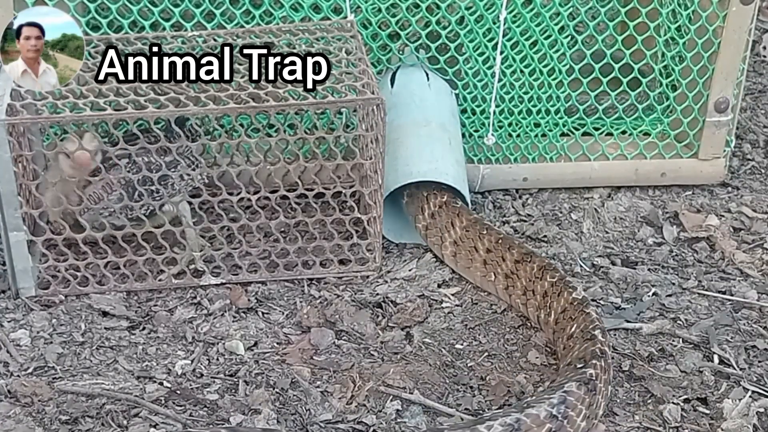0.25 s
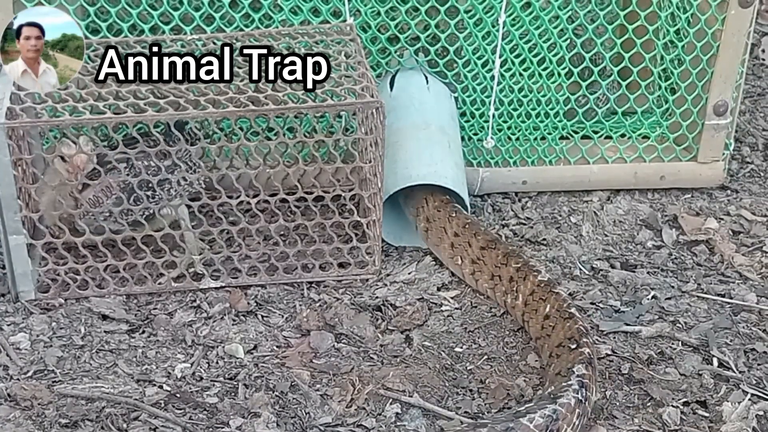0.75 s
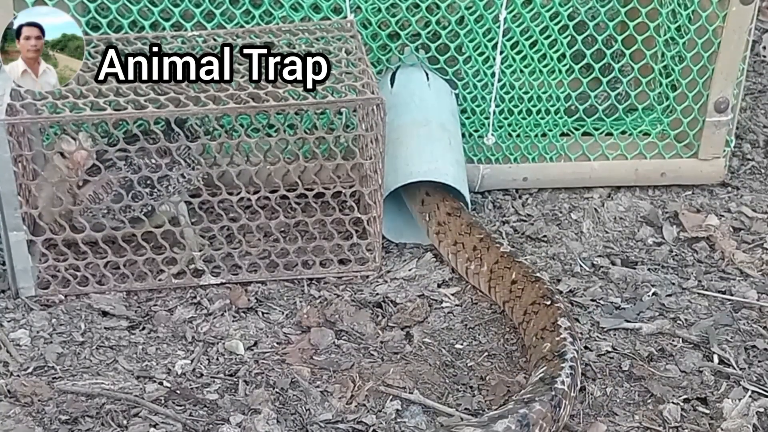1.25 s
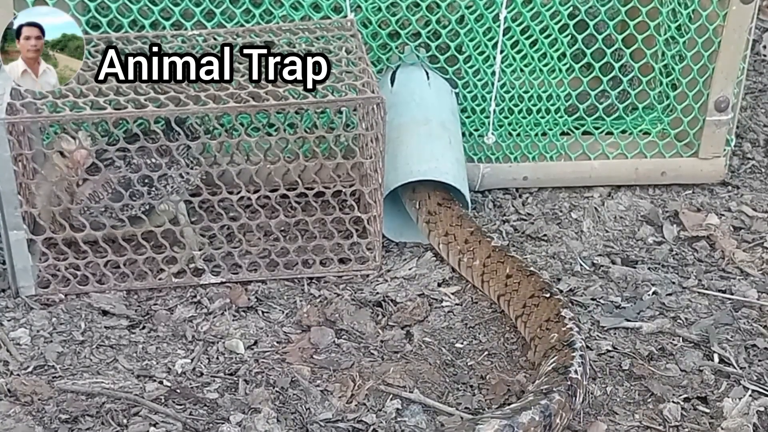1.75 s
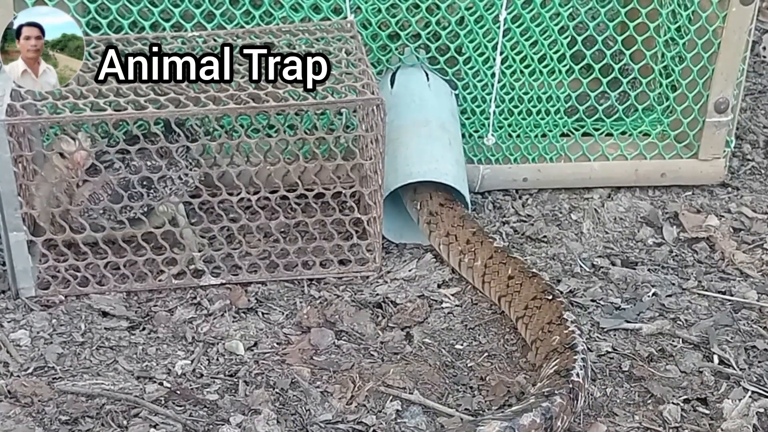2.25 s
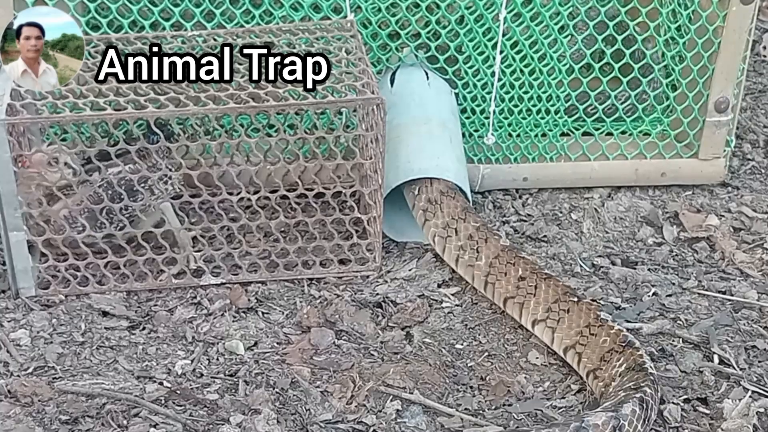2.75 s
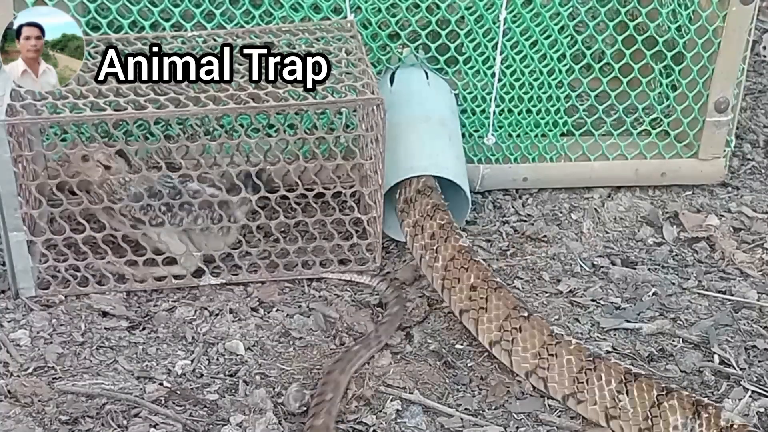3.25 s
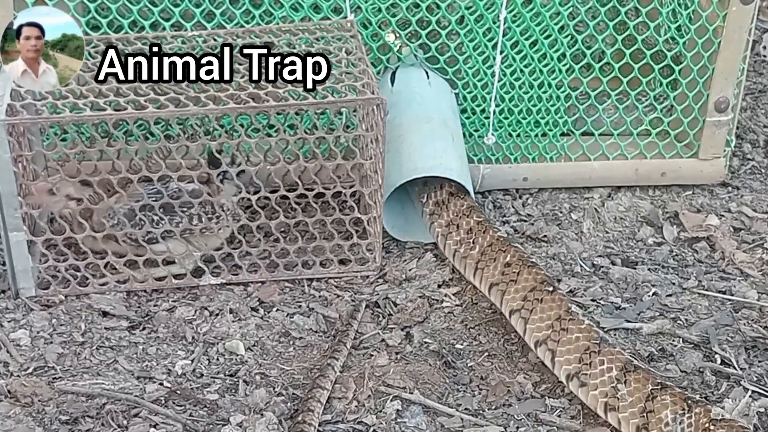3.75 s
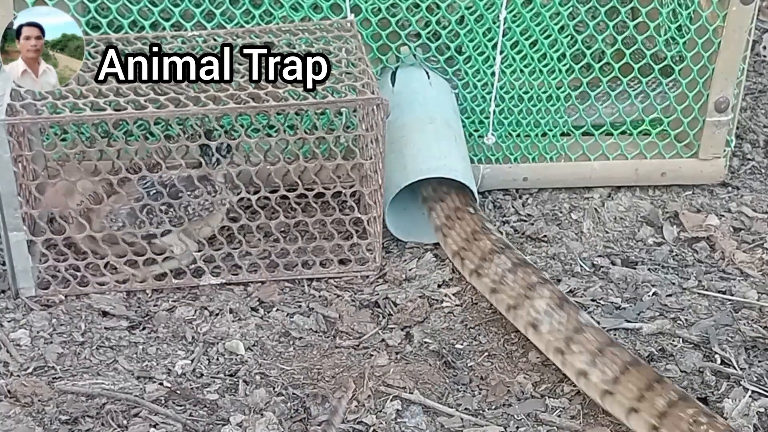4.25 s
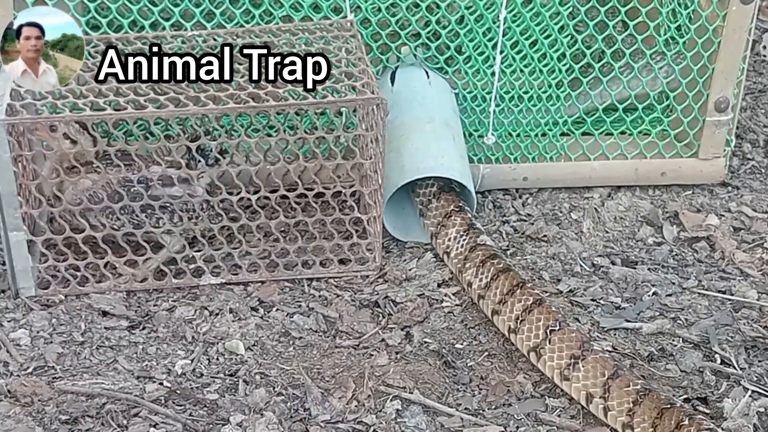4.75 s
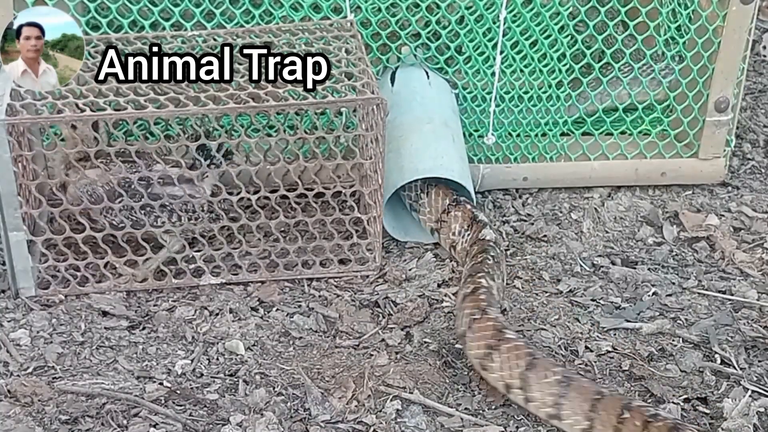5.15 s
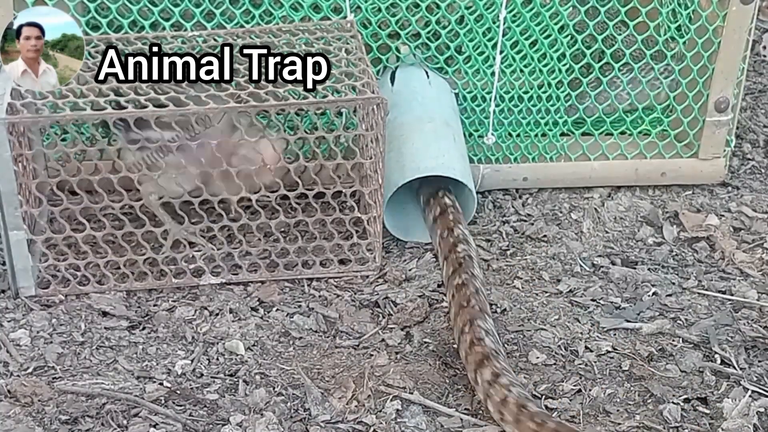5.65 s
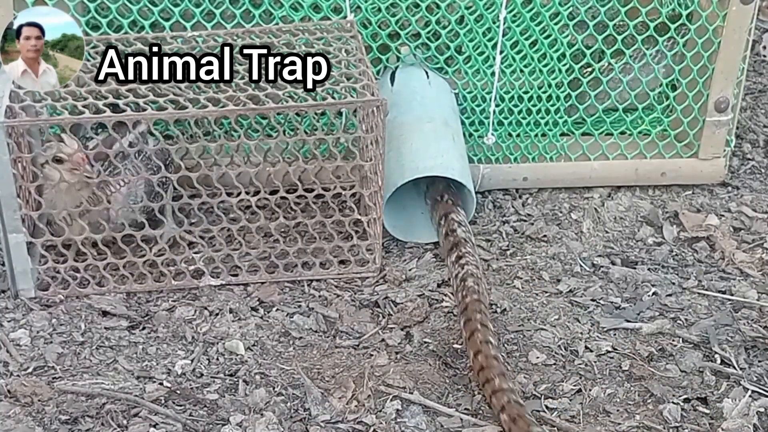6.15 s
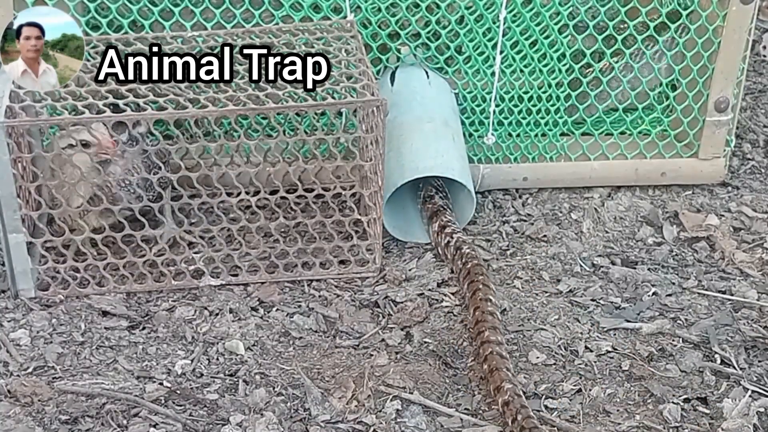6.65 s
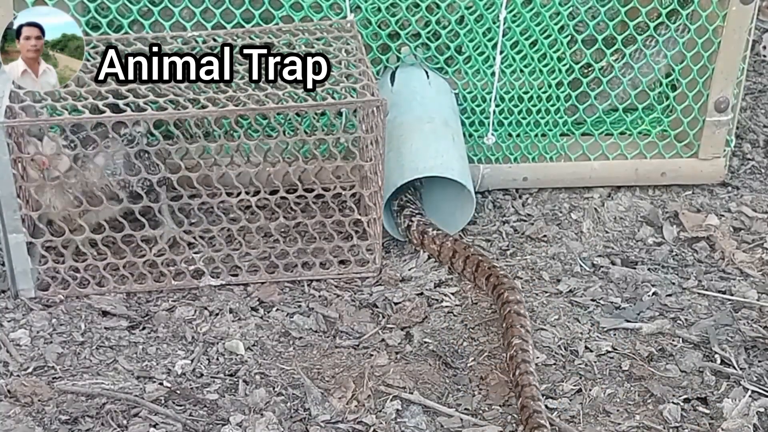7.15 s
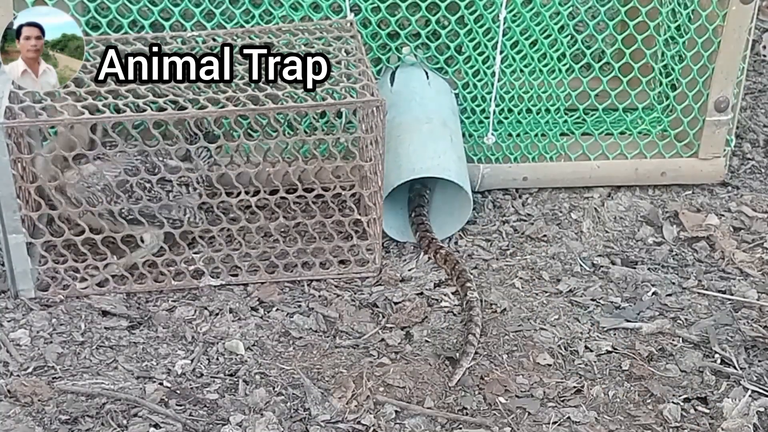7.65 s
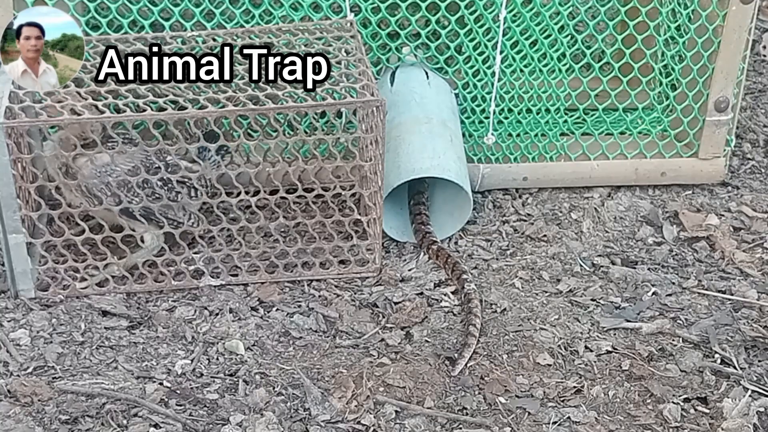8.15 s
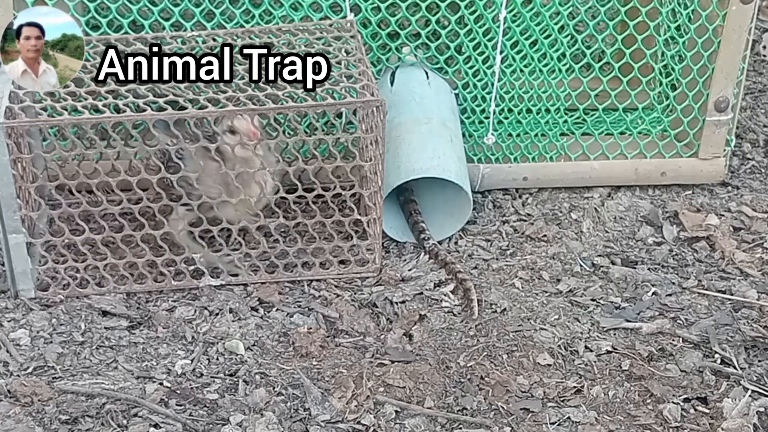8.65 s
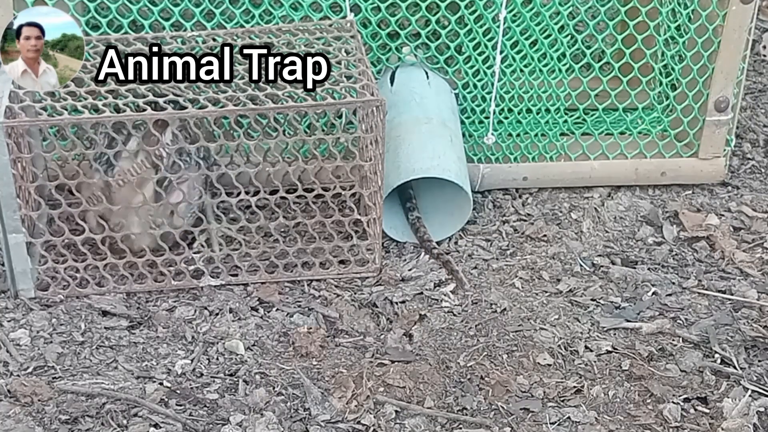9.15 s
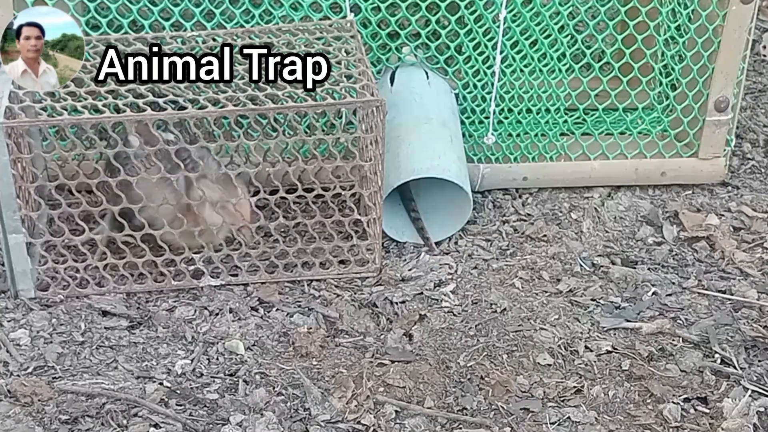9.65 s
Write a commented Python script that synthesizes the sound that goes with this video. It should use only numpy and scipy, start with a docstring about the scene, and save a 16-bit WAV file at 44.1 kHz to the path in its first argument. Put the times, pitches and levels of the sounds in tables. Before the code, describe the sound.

Two small claw ticks on wire come at about 0.1 s over soft rustling and a quiet outdoor floor. From 0.8 to 1.3 s low breeze thumps touch the microphone; a far whistle and a very faint insect band pass before 2.4 s, where the sound cuts out for an instant. At 2.5-3.15 s birds thrash hard in the cage: dense, dry, bright mesh clatter, rustling feathers and hollow knocks, loudest near 2.85 s. Sharp single hits follow at 3.5 s, with looser scrambling until 4.7 s, then a lull. Flutters return at 5.2-6.1 s with tiny cheeps around 5.4-5.7 s; a squawk and quick cry come at 6.35 s. Distant whistles and trills continue from 6.5 s among sparse ticks. Renewed wing brushing starts at 8.5 s, a wavering cheep at 8.9 s, and a loud, piercing, falling cry at 9.7-9.84 s.

```python
"""Two chicks in a small wire cage on dry litter scramble, beat their wings on the mesh and cheep.
Contacts are shaped noise bursts with a mesh ring; rustle is grained noise; knocks are damped tones.
Chicks and the birds further off are gliding sine partials; the far ones whistle and trill with more echo.
A thin insect band, breeze on the microphone and a low outdoor rumble are filtered noise.
The sound drops out once for an instant."""
import sys
import numpy as np
from scipy import signal
from scipy.fft import rfft, irfft, next_fast_len
from scipy.io import wavfile
from scipy.ndimage import uniform_filter1d

SR = 44100
rng = np.random.default_rng(int(sys.argv[2]) if len(sys.argv) > 2 else 0)


def put_to_file(sound):
    """Save the sound as 16-bit audio at rate SR, in the file named by the first command-line argument."""
    columns = np.atleast_2d(sound).T  # one column per channel
    safe = np.clip(columns, -1, 1)
    whole_steps = np.round(safe * 32767)
    wavfile.write(sys.argv[1], SR, whole_steps.astype(np.int16))


N = 437031
BURST_SAMPLES = 4096

# claws and quills striking the wire:
# (time [s], peak [dB], bright centre [Hz], dull part re peak [dB], fall [ms])
STRIKES = [(0.077, -35.5, 5450, -8.5, 2.6), (0.147, -39.5, 5700, -7, 1.8), (.673, -54, 9500, -15, 3),
           (0.905, -59.5, 5000, 13.5, 1.1), (.962, -58, 12300, -25, 4), (1.146, -51.5, 6700, -6.5, 4.5),
           (2.3862, -38.5, 8963, -13, 0.734), (2.449, -39, 11000, -20, .5),
           (2.472, -28, 8117, -15.5, 0.642), (2.487, -32, 9000, -9, .6), (2.4968, -13, 8808, -8.5, 2.2),
           (2.5231, -16.5, 7000, -10, 0.93), (2.541, -23, 8900, -4, 4), (2.5657, -21.5, 7603, -5.5, 2.8),
           (2.5819, -16, 6800, -12.5, 1.5), (2.593, -18, 9690, -8.5, 0.71), (2.6036, -23, 9000, -8, 0.83),
           (2.61, -22.5, 8600, -7, 1.1), (2.6238, -21, 9230, -14, 0.847), (2.648, -39, 6400, -19, 0.801),
           (2.67, -33, 5000, 2, 0.43), (2.7005, -29, 10400, -9, 0.62), (2.7096, -21.5, 4970, -4.5, 0.56),
           (2.7422, -27, 8990, -20, 0.391), (2.7569, -21, 8600, -22, 0.73), (2.775, -29, 10610, -1.5, 0.59),
           (2.781, -21, 6493, -7, 0.55), (2.79, -29, 7500, -10, .4), (2.812, -21.5, 8100, -14.5, 0.261),
           (2.818, -29, 7100, -6, 0.58), (2.8368, -20.5, 9200, -1, 3), (2.852, -8, 8550, -17, 0.2938),
           (2.8647, -12, 8100, -6.5, 0.51), (2.883, -22, 9400, -18, 0.2974),
           (2.8887, -20.5, 8900, -20, 0.299), (2.9094, -21.5, 7060, -27.5, 0.5),
           (2.924, -30, 6000, -27, .4), (2.959, -24, 12250, -25, 0.635), (2.9663, -17, 8300, -5, 0.9),
           (2.976, -26, 9300, -25, 0.2955), (2.997, -20, 7900, -31.5, 0.35), (3.038, -33, 9450, -4.5, 3.7),
           (3.059, -34.5, 8990, -8.5, 5.8), (3.122, -13.5, 9000, -34, 9.3), (3.1237, -20, 7850, -41, 0.75),
           (3.172, -44, 8600, -40, 40), (3.31, -38, 9210, -21, 1.181), (3.3183, -29, 8185, -18, 0.49),
           (3.3327, -31, 8480, -31, 0.3045), (3.3452, -38.5, 9300, -24, 0.304),
           (3.3832, -34, 8720, -12, 0.28), (3.543, -13.5, 8500, -21.5, 0.27), (3.863, -27.5, 9250, -4.5, 1),
           (3.9741, -31.5, 11800, -5.5, 2.8), (3.9834, -35, 10510, -4, 2.1), (4.046, -41, 6450, -30.5, 1.4),
           (4.0525, -29.5, 6100, -32, 0.56), (4.0962, -37.5, 9310, -5.5, 3.9), (4.145, -39, 9887, -8, 5.6),
           (4.183, -36.5, 7400, -5, 0.589), (4.197, -34.5, 7257, -4.5, 2.13), (4.269, -49, 8490, -2, 1.399),
           (4.2891, -27.5, 8940, -16.5, 0.62), (4.305, -36, 9810, -9, 0.3344),
           (4.311, -30.5, 7771, -9, 0.43), (4.378, -38.5, 8890, -4, 0.97), (4.447, -33, 8798, -18, 0.96),
           (4.4738, -40, 8049, -8, 3.866), (4.5415, -39, 7000, -2.5, 0.74),
           (4.5629, -25, 7100, -11.5, 0.623), (4.6079, -27, 8100, -9, 0.27), (5.145, -40, 7160, -7.5, 1.32),
           (5.1908, -29, 8523, -30, 1.3), (5.2253, -38, 7632, -11, 0.72), (5.2814, -40.5, 8847, -33, 10),
           (5.645, -35.5, 4500, -8, .6), (5.697, -43, 5000, 1, .4), (5.706, -41, 9000, -25, 2.8),
           (6.098, -38.5, 10700, -34.5, 0.941), (6.8504, -38, 9100, -13, 0.408),
           (6.891, -44, 11000, -20, .4), (6.9, -49, 10000, -8, .5), (7.2225, -35, 9700, -12.5, 1.7),
           (7.391, -49, 10000, -10, 0.51), (7.6272, -40, 6846, -8, 1.17), (7.7893, -32.5, 9160, -23, 3.8),
           (8.425, -55, 9000, -8, 0.91), (8.535, -42, 9300, -13, .8), (8.568, -51.5, 9000, -20, .8),
           (8.668, -48, 5200, -20, .8), (8.721, -36.5, 8610, -31.5, 5.9), (8.768, -47, 9400, -30, .5),
           (9.039, -29, 6800, -37, 1.35), (9.188, -48, 9480, -28, 0.597),
           (9.253, -50.5, 8990, -23.5, 1.424), (9.32, -46, 8484, -21.5, 1.484), (9.888, -47, 8640, -25, 3)]
# wing feathers sweeping across the wire:
# (time [s], peak [dB], centre [Hz], dull part re peak [dB], rise [ms])
SWEEPS = [(.52, -52, 5460, -16, 3.39), (1.343, -59.5, 3440, -10, 6.1), (1.68, -63.5, 4040, -25.5, 4.2),
          (1.881, -64.5, 4290, -25.5, 3.5), (2.49, -41, 9000, -12, 3.5), (2.563, -36, 8210, -4, 6),
          (2.6656, -43, 7500, 5.5, 8.7), (2.94, -54, 8300, 4, 10.34), (3.1735, -35, 8650, -35.5, 9.3),
          (3.418, -38.5, 10400, -1.5, 5.9), (3.756, -44, 4740, -17, 3.2), (4.217, -45.5, 8500, 1.3, 2),
          (4.6585, -45, 8260, 2, 6.3), (5.3337, -40.5, 9100, -11, 3.65), (5.36, -43.5, 8537, -13, 7.4),
          (5.429, -43.5, 8350, -16, 6.8), (5.512, -45.5, 8850, -18, 9), (5.7507, -33.5, 8450, -35, 5.7),
          (5.797, -32.5, 8550, -31.5, 6.2), (5.832, -35.5, 8491, -36, 7.9), (5.9866, -36.5, 8400, -16, 4.5),
          (6.172, -53, 9400, -2.5, 21), (6.82, -44.5, 7660, -11, 5.32), (7.18, -58.5, 4550, -31.5, 17),
          (7.581, -43.5, 8030, -1.5, 2.9), (7.651, -55, 7060, 1.5, 7.8), (7.809, -45, 6230, -6, 7.7),
          (8.3, -64, 4550, -6.5, 51), (8.33, -52.5, 8500, -29, 8.7), (8.51, -49.5, 9000, -27.5, 6.8),
          (8.545, -46.5, 6000, -2, 4), (8.697, -44, 8600, -29, 8.9), (8.7778, -40, 8006, -30, 3.8),
          (8.818, -45.5, 8100, -21, 7.4), (8.9845, -34.5, 8530, -41.5, 7.7), (9.078, -43, 7887, -31, 8.6),
          (9.099, -45, 8600, -18, 14.5), (9.216, -52, 8240, -6, 10.5), (9.3518, -36.5, 8600, -24, 7.4),
          (9.4755, -48, 8460, -27, 9.2), (9.58, -59.5, 4130, -25, 20), (9.715, -40, 9300, -22, 9.2),
          (9.8681, -45.5, 8600, -0.5, 5.553)]
# mesh ring, one broad band: (centre [Hz], width [octaves], level re burst [dB], t60 [s])
MESH_RING = (8900, 0.75, -19, 0.04)
# dull part of a contact: (frequency [Hz], relative gain [dB])
CONTACT_COLOUR = [(200, -22), (450, -8), (900, -5), (1500, -4.5), (2800, -7), (4500, -2.5), (7000, -17)]
STRIKE_RISE_MS = 0.043
SWEEP_FALL_PER_RISE, SWEEP_WIDTH_OCT, SWEEP_PATCHY_DB = 1.3, 0.33, 2.5
# stray ticks; level is re rustle, dull part re tick
TICK_COUNT, TICK_HZ, TICK_DB, TICK_DULL_DB, TICK_FALL_MS = 40, 8500, 3.5, -16.5, 0.24

# feathers and feet dragging over mesh and litter, one curve a bout: (time [s], level [dB])
RUSTLE_BOUTS = [
    [(0, -54.5), (.24, -57.5), (.3, -65.5), (.75, -65.5), (1.33, -65.5), (1.45, -73), (1.98, -81),
     (2.385, -70)],
    [(2.393, -54.5), (2.483, -51.5), (2.51, -38.5), (2.6, -42), (2.77, -50), (2.825, -48), (2.86, -37.5),
     (3.08, -49), (3.115, -58.5), (3.15, -47), (3.25, -59.5), (3.32, -47), (3.44, -56), (3.47, -58.5),
     (3.54, -55.5), (3.67, -70.5)],
    [(3.82, -60.5), (3.87, -52.5), (4.13, -47.5), (4.24, -57), (4.52, -59), (4.59, -51), (4.65, -63.5),
     (4.69, -71), (4.98, -79)],
    [(5.19, -65.5), (5.31, -53), (5.42, -61.5), (5.66, -48.5), (5.72, -53.5), (5.78, -46.5), (5.95, -61.5),
     (6.02, -54), (6.09, -63.5), (6.28, -73)],
    [(6.6, -65), (6.71, -70), (6.83, -61.5), (6.94, -67), (7.38, -71.5), (7.6, -61.5), (7.77, -62),
     (7.86, -62.5), (8.01, -71), (8.48, -71.5)],
    [(8.52, -60), (8.56, -51), (8.85, -53), (9.07, -52), (9.16, -66.5), (9.31, -65.5), (9.4, -63),
     (9.65, -70.5), (9.83, -66.5), (9.91, -56.5)],
]
# dull scuffing of feet at a rustle of -64 dB: (time [s], level [dB])
SCUFF = [(0, -72), (1.4, -69.5), (2.6, -66), (3.1, -66), (4, -70.5), (4.6, -68.5), (5.5, -70), (6.05, -67),
         (6.6, -68.5), (7.7, -70.5), (8.6, -71), (9.1, -70), (9.9, -67.5)]
SCUFF_DB_PER_RUSTLE_DB = 0.6
# mesh, soft sliding on leaves, scuffing: (frequency [Hz], relative gain [dB])
MESH_COLOUR = [(880, -57.5), (1500, -12), (1580, -14), (3180, -9), (3660, -8), (6430, -8), (8740, -2),
               (10900, -12), (14900, -10.5), (16000, -20.5)]
LITTER_COLOUR = [(900, -25), (2000, -5), (5200, -0.5), (7200, -6), (9000, -3.5), (12000, -11.5),
                 (16000, -16)]
SCUFF_COLOUR = [(150, -18), (350, -1), (700, -2.5), (1200, -4), (2000, -9.5), (3500, -11), (6000, -22)]
# edges of the rustle bands that swell on their own: (frequency [Hz])
PATCH_EDGES_HZ = [1500, 3000, 4500, 6000, 7500, 10000, 13000]
PATCH_DB, PATCH_RATE_HZ = 1.7, 45

# bodies bumping the cage: (time [s], level [dB], pitch [Hz])
KNOCKS = [(2.596, -24, 1870), (2.623, -17.5, 2260), (2.838, -17, 1390), (2.851, -21, 1196),
          (2.863, -21.5, 1127), (3.403, -36, 1120), (3.421, -33, 272), (4.095, -32.5, 1140),
          (4.177, -32.5, 963), (4.562, -27, 1410), (4.607, -32, 925), (4.664, -34, 924),
          (5.145, -44.5, 1397), (5.354, -44, 656), (5.696, -44, 821.4), (6.032, -39.5, 1020),
          (7.58, -38, 1650), (9.05, -43.5, 483)]

# arched calls, near (cheeps, squawks) and far (whistles, trills): (start [s], length [s],
# loudest point [share of length], start [Hz], loudest [Hz], end [Hz], level [dB])
CHEEPS = [(2.2465, 0.03138, 0.36, 3740, 3100, 2300, -52), (5.422, 0.03, 0.75, 2864, 3200, 1900, -29.5),
          (5.444, 0.0085, 0.52, 2860, 2220, 1900, -37), (5.576, 0.014, 0.75, 3540, 3600, 3900, -33),
          (5.584, 0.0258, 0.45, 3940, 4000, 1800, -31), (5.68, 0.011, 0.43, 5200, 4450, 3700, -40),
          (5.667, 0.023, 0.41, 3010, 3520, 1100, -30.5), (5.897, 0.037, 0.6, 2450, 3801.4, 1700, -43.5),
          (5.994, 0.013, 0.35, 3255, 2860, 1700, -49), (6.431, 0.015, 0.56, 2960, 3320, 4600, -37),
          (8.875, 0.0976, 0.72, 3900, 3730, 4300, -42.5)]
SQUAWKS = [(5.503, 0.022, 0.71, 1002, 1020, 1020, -46), (6.341, 0.017, 0.52, 880, 1173, 1360, -40.5),
           (6.422, 0.0181, 0.52, 932, 997, 1144, -36)]
WHISTLES = [(.82, 0.16, 0.069, 3330, 3300, 3230, -63), (1.55, 0.09977, 0.33, 3800, 3992, 3783, -67.5),
            (1.705, 0.051, .6, 3400, 3480, 3400, -80), (1.92, 0.13, 0.2, 3000, 3300, 3164, -65.5),
            (5.795, 0.0208, 0.403, 3740, 3780, 3756, -52), (5.872, 0.018, 0.3684, 3320, 3397, 3300, -59),
            (6.052, 0.067, 0.2557, 3830, 3800, 3924, -66), (6.508, 0.11, 0.25, 3060, 3780, 3434, -55.5),
            (6.555, .035, 0.55, 3850, 3980, 3900, -59), (6.625, 0.059, 0.28, 3470, 3300, 3200, -67),
            (6.875, 0.028, 0.42, 2550, 2550, 2550, -65), (6.55, 0.0459, 0.5113, 5100, 5250, 5197, -66),
            (6.585, 0.05, 0.46, 3150, 3760, 3580, -54), (6.974, 0.019, 0.64, 3660, 3440, 3416, -58),
            (7.232, 0.05, 0.21, 3700, 3470, 2700, -62), (7.5, 0.031, 0.2396, 969.4, 993.7, 890, -64),
            (7.385, 0.015, 0.52, 3060, 2760, 2403, -61.5), (7.72, 0.044, 0.3057, 2940, 3150, 3050, -59.5),
            (7.955, 0.041, .4, 2900, 2710, 2500, -71), (8.435, 0.053, 0.8, 3280, 3450, 3570, -73),
            (8.58, 0.0204, .5, 3300, 3270, 3250, -59), (8.815, 0.019, .4, 2700, 2840, 3200, -50.5),
            (8.608, 0.028, 0.47, 3200, 3170, 3276, -58), (8.683, 0.074, 0.496, 3210, 3030, 3040, -55),
            (8.79, 0.035, 0.5, 3100, 3102, 3050, -58), (9.012, 0.03125, 0.1513, 3220, 3204, 3200, -55),
            (9.045, 0.018, 0.341, 3270, 3237, 3120, -56), (9.55, 0.117, .4, 3450, 3376, 3400, -69),
            (9.835, 0.02768, 0.35, 2719, 2718, 2785, -49)]
TRILLS = [(6.54, 0.117, 0.79, 2590, 2640, 2680, -66), (6.702, 0.16, 0.7, 2990, 2737, 2710, -54.5),
          (6.988, 0.15, 0.5, 2770, 2600, 2550, -55), (8.24, 0.19, 0.495, 2735, 2640, 2580, -69.5),
          (9.455, .2, 0.54, 2890, 2900, 2880, -64)]
# near cries and far gliding whistles, one curve a call: (time [s], pitch [Hz], level [dB])
CRIES = [
    [(6.3515, 2930, -36), (6.357, 3500, -29), (6.3625, 3900, -38.5), (6.37, 2000, -41)],
    [(8.847, 3580, -53), (8.8634, 4200, -45), (8.9059, 3960, -41.5), (8.9193, 4140, -49),
     (8.935, 4017, -37), (8.9522, 4510, -51), (8.9587, 3660, -37.5), (8.9722, 2270, -43)],
    [(9.686, 4300, -57), (9.698, 4340, -58.5), (9.702, 4270, -32), (9.7095, 4140, -25), (9.7269, 4240, -25),
     (9.7324, 4040, -18.5), (9.7445, 4100, -24), (9.7514, 3980, -22), (9.7853, 3870, -26.5),
     (9.7908, 3700, -37), (9.7958, 3700, -23), (9.8032, 3580, -28), (9.8097, 3500, -25),
     (9.8117, 3500, -37.5), (9.8142, 3309, -27), (9.8175, 3100, -37), (9.8227, 2990, -27),
     (9.8282, 2770, -39), (9.8327, 2530, -33), (9.8392, 2220, -35.5)],
]
GLIDES = [
    [(7.01, 1050, -83), (7.08, 1065, -72), (7.18, 1287, -64), (7.23, 1270, -65.5), (7.275, 870, -76)],
    [(7.295, 3300, -70), (7.33, 3620, -65), (7.395, 3340, -68), (7.415, 2840, -78), (7.47, 2740, -69),
     (7.565, 2180, -79)],
    [(7.965, 3980, -69), (7.9954, 3630, -93), (8.0273, 2930, -70), (8.085, 2110, -70), (8.125, 2000, -75)],
    [(9.245, 4740, -57), (9.2585, 3750, -69), (9.29, 3280, -83), (9.3278, 2810, -49), (9.3557, 2450, -53),
     (9.3747, 2447, -71)],
    [(9.628, 1280, -67.5), (9.76, 1267, -56), (9.8, 1350, -59), (9.84, 1440, -54), (9.87, 1437, -53),
     (9.903, 1294, -55)],
]
# partials: (multiple of the pitch [1], level [dB])
CHEEP_PARTIALS = [(1, 2), (2, -26), (3, -43)]
SQUAWK_PARTIALS = [(1, -7.5), (2, 1.5), (3, -1), (4, -3.5), (5, -13.5), (6, -24)]
# trill rates in the order of TRILLS: (rate [Hz])
TRILL_RATES_HZ = [52, 50.5, 52, 68, 73]
# how pointed the loudness arch is: 0 flat, 1 a triangle
CHEEP_POINT, SQUAWK_POINT, WHISTLE_POINT, TRILL_POINT = 0.73, 0.93, 0.44, 0.53
# how long the pitch lingers near the loudest point: 1 = straight glides
CHEEP_BEND, SQUAWK_BEND, WHISTLE_BEND = 2.01, 0.98, 1.3
# the two sides of a chick's syrinx beat in cheeps; phase [turns] at the loudest point
BEAT_HZ, BEAT_DEPTH, BEAT_TURN = 142.87, 0.5, 0.38
# split as a share of the squawk; rasp depth as a share of amplitude
SQUAWK_SPLIT, RASP_DEPTH, RASP_RATE_HZ = 0.38, 0.2, 3500
WHISTLE_WOBBLE, WHISTLE_FLUTTER_DB = 0.009, 3.0  # wobble: share of pitch
# swing and wobble: share of pitch; pulse: +- dB over a swing
TRILL_SWING, TRILL_PULSE_DB, TRILL_UNEVEN_RAD = 0.065, 5.5, 0.22
TRILL_WOBBLE, TRILL_FLUTTER_DB = 0.014, 2.2
NEAR_ECHO_DB, FAR_ECHO_DB = -38.5, -27

# distant insect: (time [s], level [dB])
INSECT = [(1.3, -97), (1.8, -82.5), (2.38, -83.5), (2.4, -97)]
INSECT_HZ = 9080

# breeze on the microphone: (time [s], level [dB])
GUST = [(.45, -70), (.78, -72), (.9, -41.5), (.96, -55), (1.15, -38.5), (1.3, -53), (1.36, -71),
        (1.74, -86), (1.8, -52), (1.9, -83)]
# single eddies: (time [s], peak [dB], pitch [Hz])
THUMPS = [(0.818, -41.5, 112), (0.858, -32.5, 87), (0.91, -30, 108), (1.154, -44, 71.5), (1.202, -30, 89.5),
          (1.282, -37.5, 110)]
# breeze, outdoor floor: (frequency [Hz], relative gain [dB])
GUST_COLOUR = [(12, -54.5), (20, -22), (65, 4.5), (130, 0.5), (153, -6), (214, -15.5), (258, -24),
               (500, -44.5), (650, -75.5), (1100, -120)]
AIR_COLOUR = [(12, -39.5), (20, -6), (113, 2.5), (513, -20.5), (574, -17), (1030, -23.5), (2530, -23.5),
              (2750, -21.5), (3070, -24), (7520, -37.5), (9400, -28), (11400, -51.5), (14700, -33.5),
              (16000, -40)]
# swell of the low rumble: (time [s], gain re floor [dB])
RUMBLE = [(0, -13), (.6, 1.5), (1.5, -5.5), (2.3, -2.5), (2.8, -1), (3.3, 0.5), (4.2, 1), (4.9, -2),
          (5.7, 4), (6.3, 0), (7, 3), (8.1, -3), (8.8, 3.5), (9.9, -4.5)]
FLOOR_DB = -64  # before the low and high gains

DROPOUT_S, DROPOUT_LEN_S = 2.379, 0.006
TOP_HZ = 15700


def undb(db):
    """Decibels to amplitude."""
    return 10 ** (np.asarray(db, float) / 20)


def curve(rows, axis):
    """One column of a table as a value per sample."""
    rows = np.array(rows, float)
    return np.interp(np.arange(N) / SR, rows[:, 0], rows[:, axis])


def colour(x, points):
    """Filter the last axis by (Hz, dB) points, scaled to keep white noise at rms 1."""
    hz, db = np.transpose(points)
    size = next_fast_len(x.shape[-1])
    bins_hz = np.fft.rfftfreq(size, 1 / SR)
    gain = undb(np.interp(np.log(bins_hz + 1), np.log(hz), db))
    return irfft(rfft(x, size) * gain, size)[:x.shape[-1]] / np.sqrt(np.mean(gain ** 2))


def walk(rate_hz):
    """Random levels held 1 / rate_hz s and slewed twice; spread near 1."""
    k = int(SR / rate_hz)
    held = np.repeat(rng.standard_normal(N // k + 1), k)
    return 1.49 * uniform_filter1d(uniform_filter1d(held, k), k)[:N]


def add(out, s, x):
    """Mix a short sound in at time s."""
    i = int(s * SR)
    out[i:i + len(x)] += x[:N - i]


def scramble():
    """Rustle level in dB and the effort (0.1-1) behind it."""
    db = curve(np.concatenate(RUSTLE_BOUTS), axis=1)
    return db, np.clip((db + 70) / 16, 0.1, 1)


def stray_ticks():
    """Small contacts scattered in time by effort squared, so mostly where the scramble is hard."""
    level_db, effort = scramble()
    when, size, spot = rng.random((TICK_COUNT, 3)).T
    busy = np.cumsum(effort ** 2)
    target = (np.arange(TICK_COUNT) + when) / TICK_COUNT * busy[-1]
    i = np.searchsorted(busy, target).clip(BURST_SAMPLES, N - 1)
    db = level_db[i] + TICK_DB + 6 * (size - 0.5)
    hz = TICK_HZ * 2 ** (0.6 * (spot - 0.5))
    return [(k / SR, d, f, TICK_DULL_DB, STRIKE_RISE_MS, TICK_FALL_MS) for k, d, f in zip(i, db, hz)]


def contacts():
    """All contacts as (s, dB, centre Hz, dull dB, rise ms, fall ms): strikes, sweeps and ticks."""
    strikes = [(s, db, hz, dull, STRIKE_RISE_MS, fall) for s, db, hz, dull, fall in STRIKES]
    sweeps = [(s, db, hz, dull, ms, SWEEP_FALL_PER_RISE * ms) for s, db, hz, dull, ms in SWEEPS]
    return strikes + sweeps + stray_ticks()


def mesh_contacts():
    """Each contact is a noise burst round its own centre with a duller part; the mesh rings after it."""
    out, hz = np.zeros(N), np.fft.rfftfreq(BURST_SAMPLES, 1 / SR) + 1
    lead = BURST_SAMPLES // 4
    ms = (np.arange(BURST_SAMPLES) - lead) / SR * 1000
    ring_hz, ring_oct, ring_db, ring_t60_s = MESH_RING
    ring_band = np.exp(-(np.log2(hz / ring_hz) / ring_oct) ** 2)
    for s, db, centre_hz, dull_db, rise, fall in contacts():
        a, b, c = rng.standard_normal((3, BURST_SAMPLES))
        # rise and fall are times over 9.5 dB, with floors for the bright part
        shape = undb(-9.5 * np.where(ms < 0, -ms / max(rise, 0.08), ms / max(fall, 0.3)))
        slow = undb(-9.5 * np.where(ms < 0, -ms / (rise + 0.096), ms / (fall + 2.27)))
        # a sharp blow is broad; a slow sweep of feathers keeps near its centre
        width_oct = SWEEP_WIDTH_OCT if rise > 2.5 else 0.4201
        peak = np.exp(-(np.log2(hz / centre_hz) / width_oct) ** 2)
        tilt = undb(-14.5 - min(0.45 * rise, 11)) + peak
        tilt = tilt / (1 + (2000 / hz) ** 4)  # steep below the mesh's first tones
        # each spot struck favours its own few bands
        knots = np.arange(0, len(hz), 32)
        bands = np.interp(np.arange(len(hz)), knots, b[:len(knots)])
        tilt = tilt * undb((SWEEP_PATCHY_DB if rise > 1 else 3.5) * bands)
        crack = irfft(rfft(a) * tilt) * shape
        # every crack carries the energy of its envelope, whatever the noise draws
        crack = crack * np.sqrt(np.sum(shape ** 2) / np.sum(crack ** 2))
        ring = irfft(rfft(c) * ring_band)
        t60_s = np.where(ms < 0, rise / 200, ring_t60_s)
        ring = ring / ring.std() * undb(ring_db - 0.06 * abs(ms) / t60_s)
        dull = undb(dull_db) * colour(b, CONTACT_COLOUR) * slow
        add(out, s - lead / SR, undb(db) * (crack + ring + dull))
    return out


def patchy(x):
    """Each band swells and fades by itself, as different leaves and wires are touched."""
    size = next_fast_len(N)
    spectrum = rfft(x, size)
    band = np.searchsorted(PATCH_EDGES_HZ, np.fft.rfftfreq(size, 1 / SR))
    return sum(irfft(spectrum * (band == k), size)[:N] * undb(PATCH_DB * walk(PATCH_RATE_HZ))
               for k in range(len(PATCH_EDGES_HZ) + 1))


def rustle():
    """Dense scratches: noise under soft random grains; a hard scramble is rougher and shakes the mesh."""
    bright_db, effort = scramble()
    scuff_db = curve(SCUFF, axis=1) + SCUFF_DB_PER_RUSTLE_DB * (bright_db + 64)
    hits = undb(1.7 * rng.exponential(size=N)) * (rng.random(N) < 400 / SR)  # 400 a second
    smeared = signal.lfilter([0.02], [1, -0.98], hits ** 2)
    grains = np.sqrt(0.13 + 25 * effort * smeared) * undb((1.1 + 1.7 * effort) * walk(40))
    grains = grains / np.sqrt(uniform_filter1d(grains ** 2, size=6000))  # even out the level

    def layer(points):
        return colour(rng.standard_normal(N) * grains, points) * undb(0.74 * walk(55))

    mesh, litter, scuff = layer(MESH_COLOUR), layer(LITTER_COLOUR), layer(SCUFF_COLOUR)
    bright = np.sqrt(effort) * mesh + np.sqrt(1 - effort) * litter
    return patchy(bright) * undb(bright_db) + scuff * undb(scuff_db)


def knocks():
    """Bodies bumping the cage: a short damped tone pair."""
    out, t = np.zeros(N), np.arange(BURST_SAMPLES // 2) / SR
    for s, db, hz in KNOCKS:
        a, b = rng.random(2)
        upper = np.sin(2 * np.pi * (hz * (3.1 + 0.08 * a) * t + b))
        tone = np.sin(2 * np.pi * hz * t) + 0.098 * upper
        decay = np.exp(-np.log(1000) * t * max(hz, 900) / 22)  # a few cycles of ring
        add(out, s, undb(db) * tone * decay * (1 - np.exp(-t / 0.000067)))
    return out


def arches(rows, point, bend, depth=0.):
    """Call rows as curves: pitch bends start-loudest-end, loudness swells and fades, perhaps beating."""
    u, calls = np.linspace(0, 1, 40), []
    for s, length, top, start_hz, top_hz, end_hz, db in rows:
        swell = np.interp(u, [0, np.clip(top, 0.05, 0.95), 1], [0, 1, 0])
        hz = top_hz + (np.where(u < top, start_hz, end_hz) - top_hz) * (1 - swell) ** bend
        beat = 1 - depth * np.sin(np.pi * (BEAT_HZ * length * (u - top) + BEAT_TURN)) ** 2
        gain = (swell + 0.02) ** point * np.clip(beat, 0.03, 1)
        calls.append(np.transpose([s + length * u, hz, db + 20 * np.log10(gain)]))
    return calls


def voice(calls, partials, wobble, flutter_db, swing=0., pulse_db=0., rates_hz=None, split=-1., rough=0.):
    """A syrinx: sine partials on a gliding pitch, slightly unsteady, with an optional trill."""
    out, drift, flutter, uneven = np.zeros(N), walk(300), walk(150), walk(60)
    rasp = 1 + rough * walk(RASP_RATE_HZ)
    for call, rate_hz in zip(calls, rates_hz or np.zeros(len(calls))):
        s, hz, db = np.transpose(call)
        i = np.arange(int(s[0] * SR), min(int(s[-1] * SR), N))
        trill = np.sin(2 * np.pi * rate_hz * (i / SR - s[0]) + TRILL_UNEVEN_RAD * uneven[i])
        pitch = np.interp(i / SR, s, hz) * (1 + wobble * drift[i] + swing * trill)
        phase = 2 * np.pi * np.cumsum(pitch) / SR
        # a hoarse voice splits: odd partials enter as it goes
        odd = np.clip(4 * (np.linspace(0, 1, len(i)) - split), 0, 1)
        tone = sum(undb(g) * np.sin(k * phase) * (odd if k % 2 else 1) for k, g in partials)
        edge = np.clip(np.minimum(i - i[0], i[-1] - i) / (0.0031 * SR), 0, 1)
        # a trill is loudest at the top of each swing
        level_db = np.interp(i / SR, s, db) + flutter_db * flutter[i] + pulse_db * trill
        out[i] += np.sqrt(2) * tone * rasp[i] * edge * undb(level_db)
    return out


def with_echoes(x, echo_db):
    """Add a short blur of outdoor echoes: decaying noise as impulse response, t60 63 ms."""
    t = np.arange(BURST_SAMPLES) / SR
    echoes = rng.standard_normal(BURST_SAMPLES) * np.exp(-np.log(1000) * t / 0.063) * (t > 0.004)
    return x + signal.fftconvolve(undb(echo_db) * x, echoes)[:N]


def chicks():
    """Near syrinxes: cheeps, cries and hoarse short squawks, almost dry."""
    cheep_calls = arches(CHEEPS, CHEEP_POINT, CHEEP_BEND, BEAT_DEPTH) + CRIES
    cheeps = voice(cheep_calls, CHEEP_PARTIALS, 0.016, 0.82)
    squawks = voice(arches(SQUAWKS, SQUAWK_POINT, SQUAWK_BEND), SQUAWK_PARTIALS, 0.038, 1.2,
                    split=SQUAWK_SPLIT, rough=RASP_DEPTH)
    return with_echoes(cheeps + squawks, NEAR_ECHO_DB)


def distant_birds():
    """Far syrinxes: whistles, long glides and trills, with stronger echoes than the chicks."""
    whistles = voice(arches(WHISTLES, WHISTLE_POINT, WHISTLE_BEND), [(1, -2.0), (2, -44.0)],
                     WHISTLE_WOBBLE, WHISTLE_FLUTTER_DB)
    glides = voice(GLIDES, [(1, -0.5), (2, -27.0)], 0.0048, 2.6)
    trills = voice(arches(TRILLS, TRILL_POINT, WHISTLE_BEND), [(1, 0.0), (2, -23), (3, -17)],
                   TRILL_WOBBLE, TRILL_FLUTTER_DB, TRILL_SWING, TRILL_PULSE_DB, TRILL_RATES_HZ)
    return with_echoes(whistles + glides + trills, FAR_ECHO_DB)


def insect():
    """Narrow noise that throbs a little."""
    points = [(INSECT_HZ - 500, -40), (INSECT_HZ - 120, 0), (INSECT_HZ + 120, 0), (INSECT_HZ + 500, -40)]
    band = colour(rng.standard_normal(N), points)
    return band * undb(curve(INSECT, axis=1) + 3 * walk(6.7))


def breeze():
    """Turbulence on the capsule: lumpy low noise with a few single thumps."""
    out = colour(rng.standard_normal(N), GUST_COLOUR) * undb(curve(GUST, axis=1) + 2.9 * walk(25))
    for s, db, hz in THUMPS:
        t = np.arange(int(1.6 * SR / hz)) / SR  # 1.6 cycles
        add(out, s, undb(db) * np.sin(2 * np.pi * hz * t) * np.hanning(len(t)))
    return out


def air():
    """Steady outdoor floor; the low rumble wavers."""
    floor = colour(rng.standard_normal(N), AIR_COLOUR) * undb(FLOOR_DB)
    low = signal.sosfilt(signal.butter(2, 220, fs=SR, output="sos"), floor)
    rumble_db = curve(RUMBLE, axis=1) + 0.44 * walk(2.3) + 2.4 * walk(19)
    return undb(-4.0) * (floor - low) + low * undb(rumble_db)


def scene():
    """All sources at one microphone."""
    cage = mesh_contacts() + rustle() + knocks() + chicks()
    return (cage + distant_birds() + insect() + breeze() + air())[None]


def record(dry):
    """The sound drops out for an instant once; the microphone loses the deep bass and the top is cut."""
    t = np.arange(N) / SR
    from_middle_s = abs(t - DROPOUT_S - DROPOUT_LEN_S / 2)
    gate = np.clip((from_middle_s - DROPOUT_LEN_S / 2) / 0.002, 0.03, 1)  # 2 ms slopes
    heard = signal.sosfilt(signal.butter(2, 45, "high", fs=SR, output="sos"), dry * gate)
    return signal.sosfilt(signal.ellip(8, 0.2, 70, TOP_HZ, fs=SR, output="sos"), heard)


dry = scene()
out = record(dry)
put_to_file(out)
```